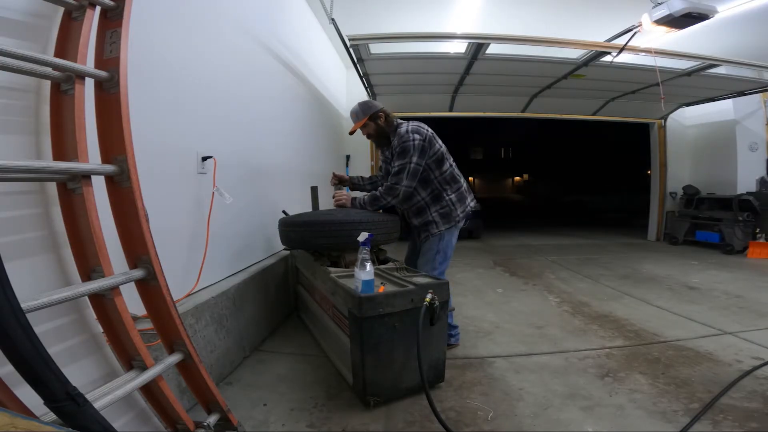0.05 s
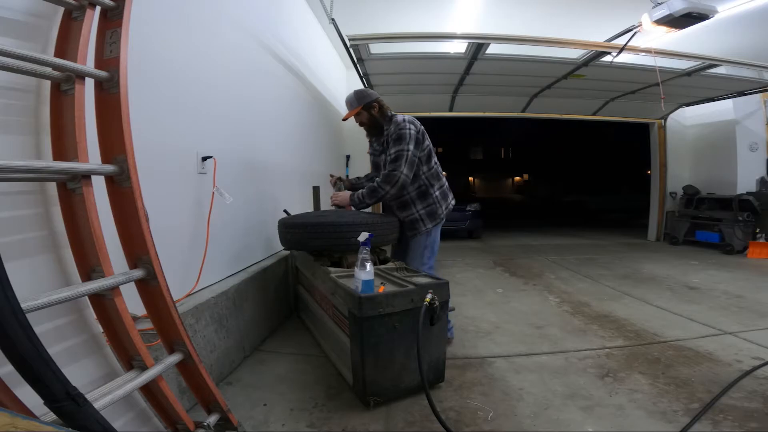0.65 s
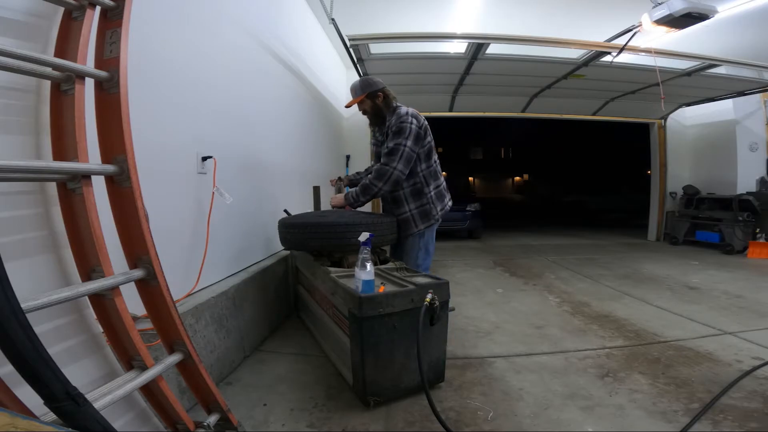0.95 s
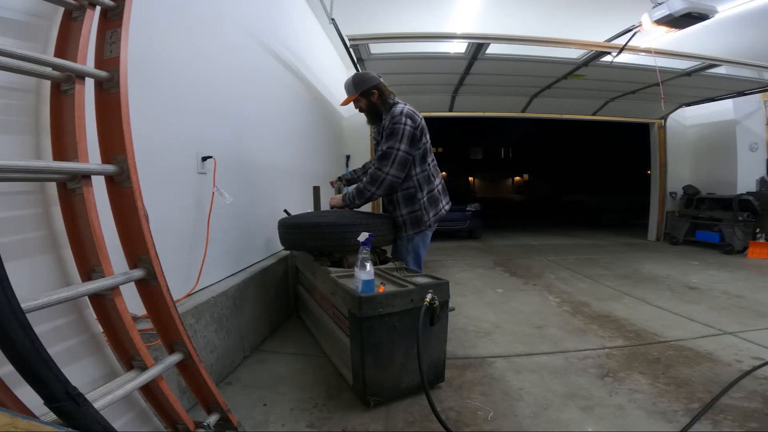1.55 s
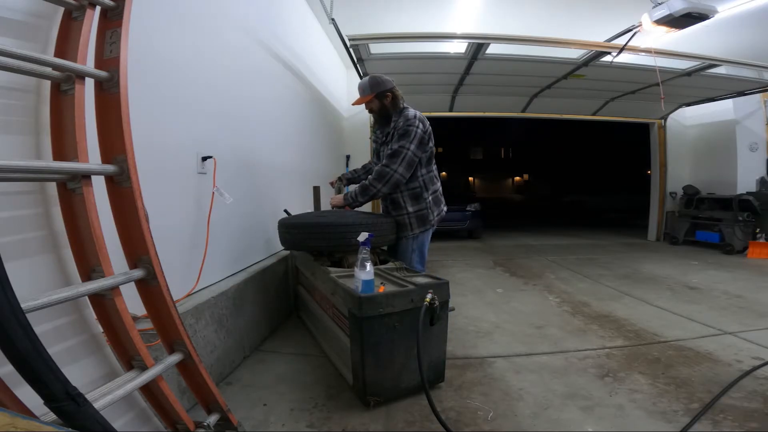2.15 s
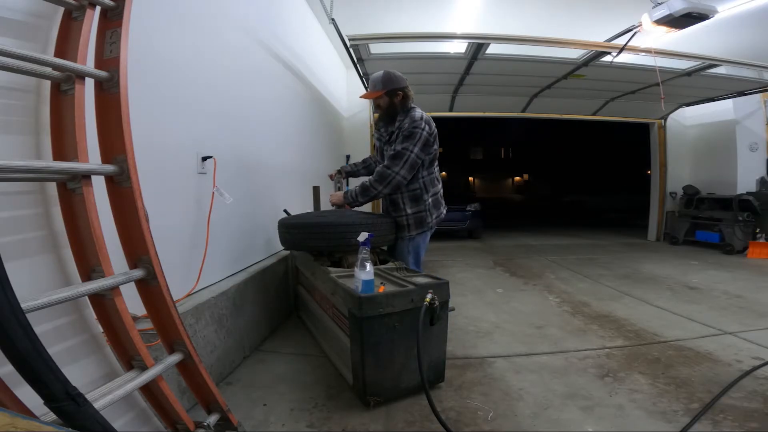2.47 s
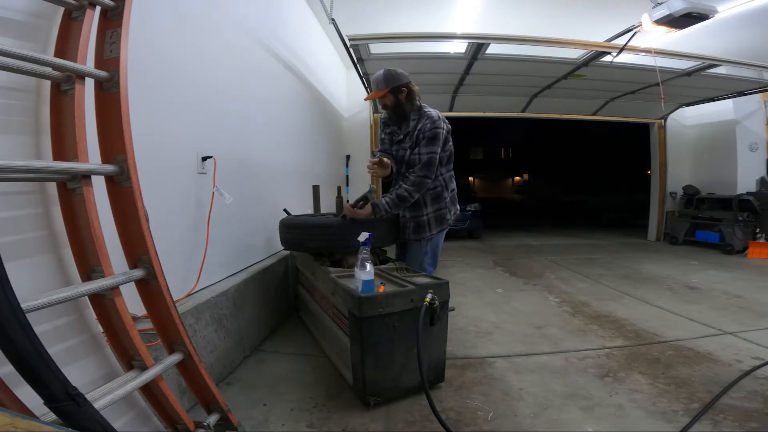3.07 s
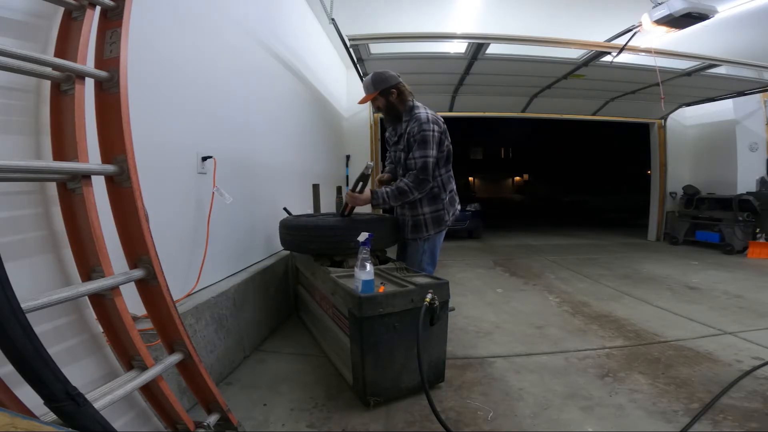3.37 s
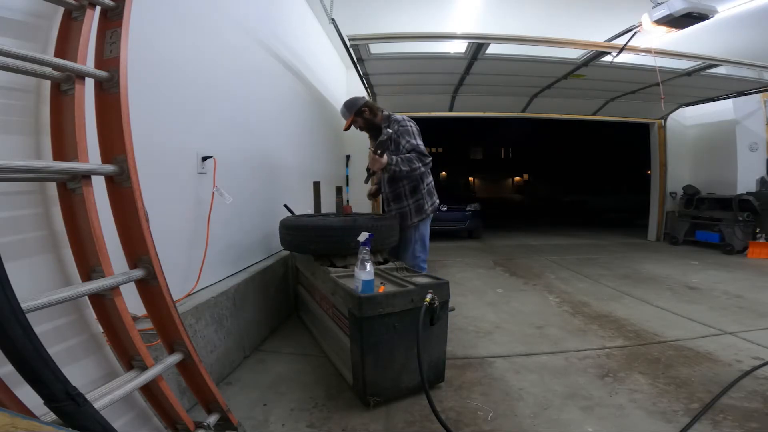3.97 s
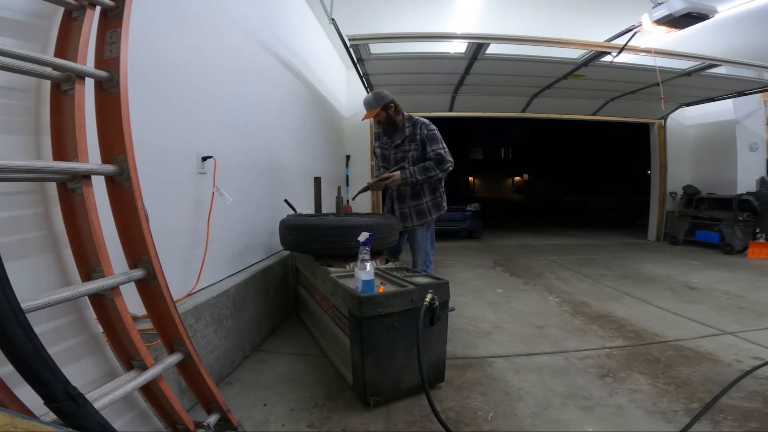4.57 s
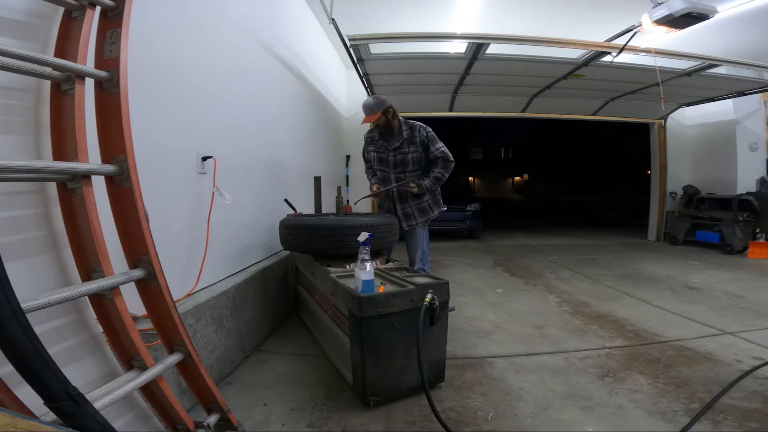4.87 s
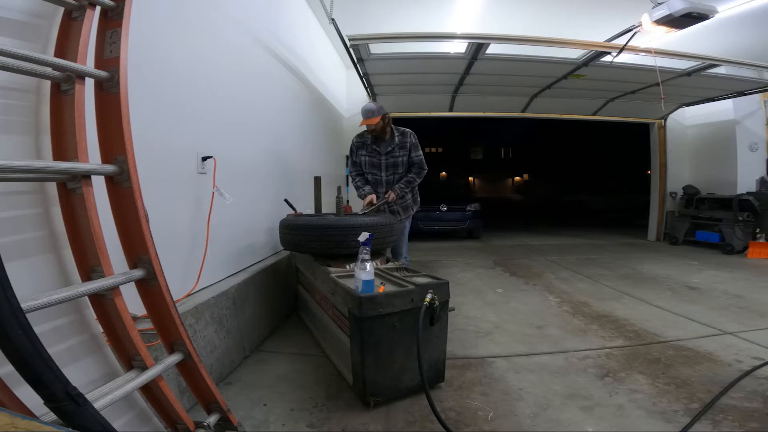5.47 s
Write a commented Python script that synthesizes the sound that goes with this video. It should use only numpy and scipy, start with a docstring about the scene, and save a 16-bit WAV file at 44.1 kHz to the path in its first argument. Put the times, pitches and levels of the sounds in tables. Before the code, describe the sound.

A piston air compressor runs loudly and evenly for the whole stretch, nearly six seconds: a low, fast-throbbing drone with rushing air and a fine valve rattle. Over it, someone works a steel bar around a tire. A dull, chattering clank comes at about 0.3 seconds, a light knock with two soft tire thuds around 1 second, and a small tap at 1.4. From 2 seconds the bar rasps along the rubber, strongest near 2.7, with a dull knock at 3. A short, rough squeak at 3.7 leads into the strongest clank at 3.85, bright and ringing on the wheel rim, with a thud beneath. Between 4.3 and 4.8 come faint hissing slides on wet rubber, a brief high squeak and light taps. Another clank lands at 5.4. Everything is heard through one microphone, with the short echo of a concrete garage.

```python
"""Tire change beside a compressor

One microphone in a concrete garage. A piston air compressor runs throughout, droning on the multiples
of its crank speed. In the same room someone works a steel bar around a tire on a manual changer:
the bar clanks on the rim, the tire thuds, and its rubber bead squeaks and scrapes along the steel."""
import sys
import numpy as np
from scipy import signal
from scipy.fft import rfft, irfft, next_fast_len
from scipy.io import wavfile
from scipy.ndimage import map_coordinates

SR = 44100
rng = np.random.default_rng(int(sys.argv[2]) if len(sys.argv) > 2 else 0)


def digitize_waveform(pressure):
    """Quantize a signal to 16-bit integers and store it at the path in sys.argv[1].

    Rows of a 2-D input are taken as channels; values are limited to [-1, 1].
    """
    field = np.atleast_2d(pressure).T
    bounded = np.clip(field, -1, 1)
    quanta = np.round(bounded * 32767).astype(np.int16)
    wavfile.write(sys.argv[1], SR, quanta)


N = 252693

# Levels in the tables are relative; spectra give the level per Hz.
# speed of the crank: time_s, turns_per_s
CRANK_SPEED = [(0, 24.803), (2, 24.815), (5.73, 24.832)]
# the pump's drone: crank_multiple, level_db
DRONE_LINES = [(1, -59), (2, -35), (3, -61), (4, -31.5), (5, -52), (6, -19.5), (7, -20), (8, -4.5),
               (9, -22.5), (10, -10), (11, -1.5), (12, -0.5), (13, -5.5), (14, 1.5), (15, -6.5), (16, -7),
               (17, -12), (18, -5), (19, -24.5), (20, -14), (21, -24), (22, -25.5), (23, -15.5), (24, -9),
               (25, -7.5), (26, -41), (27, -18.5), (28, -15), (29, -31), (30, -15), (31, -24.5), (32, -71),
               (33, -14), (34, -71), (35, -18.5), (36, -66), (37, -13.5), (38, -10), (39, -19), (40, -73),
               (41, -19), (42, -63), (43, -29), (44, -42), (45, -21.5), (46, -32.5), (47, -32), (48, -23),
               (49, -32), (50, -30), (51, -31), (52, -33), (53, -28), (54, -33), (55, -30.5), (56, -36)]
# when each range of the drone swells after the stroke, smeared by tank and walls: freq_hz, delay_turns
SWELL_DELAY = [(200, -.6), (270, -1), (350, -.53), (450, .56), (540, .8), (720, .8), (760, 1.17),
               (1050, 1.17), (1400, 2)]
# ringing of the pump's housing: pitch_hz, level_db
HOUSING_LINES = [(1491, -63), (1615, -54), (1685, -42.5), (1712, -44.5), (1787, -86), (1814, -52.5),
                 (1986, -73), (2719, -50), (2815, -54.5), (3165, -59), (3252, -71), (3898, -55.5),
                 (4194, -74)]
# rush of the valves and cooling fan: freq_hz, level_db
RUSH_SPECTRUM = [(200, -30), (520, 1), (750, 1), (950, 1), (1200, -2), (1450, -5), (2800, -5),
                 (3900, -10.5), (4800, -13.5), (6000, -19.5), (8500, -33), (11000, -35.5), (12200, -29),
                 (13500, -39)]
# rattle of the reed valves: freq_hz, level_db
RATTLE_SPECTRUM = [(1200, -49), (1420, 15), (2000, 7.5), (3300, 5), (4300, -3), (7000, -33.5), (9000, -53)]
# the motor's magnetic hum: pitch_hz, level_db
HUM_LINES = [(120, -45), (240, -31.5)]
# rumble of the tank: freq_hz, level_db
TANK_SPECTRUM = [(20, -44), (55, -42), (85, -26), (125, -10), (200, -7), (290, -8), (345, 0), (400, -5),
                 (470, -14), (900, -30), (2000, -60)]
# blows of steel on steel: start_s, level_db, brightness_db_per_octave, rim_share, contact_count
BLOWS = [(.198, -25.5, -12, 0, 1), (.265, -17.5, -8, 0.1, 3), (.926, -28, -8, .1, 2),
         (1.41, -28, -2, .2, 1), (3.035, -24, -11, 0.2, 2), (3.846, -14.5, 2.5, 0.86, 3),
         (4.674, -30, 3, 0.3, 1), (4.785, -29, -10, 0.1, 1), (5.437, -18.5, 0.5, 0.25, 2)]
# the wheel rim: pitch_hz, level_db, t60_s
RIM_MODES = [(1304, -5, 1), (1750, -4, 1), (2000, -14, 0.34), (2132, 4, 0.78), (2247, 6, 0.71),
             (2410, -1, 0.77), (2450, -3, 1), (2470, 2, 0.86), (2525, 1, 0.77), (2840, -19, .5),
             (2940, -0.5, 0.85), (3330, -8, 1), (3650, -6, 1), (3960, -8, 1), (3900, -8, 1),
             (4377, -2.5, 0.76), (4560, -11, 0.76), (4640, -21, .5), (5100, -13, 0.65), (5100, -19, 0.64),
             (5600, -24, 0.76), (6067, -16, 1), (6600, -18, 0.71), (6870, -15, 0.96), (7806, -20.5, 0.92),
             (8500, -27, 0.42), (9750, -29.5, 0.49), (11600, -32, 0.62), (12500, -38, 0.38)]
# the bar, damped by the hands: pitch_hz, level_db, t60_s
BAR_MODES = [(1660, -7, 0.15), (1943, 2, 0.078), (2670, -12, .12), (3070, -1.5, .12), (3320, -4, 0.1),
             (3870, -13, 0.064), (4240, -8.5, 0.19), (4990, -14, 0.68), (6350, -35, 0.14),
             (6970, -13, 0.16)]
# the dense short clatter of a contact: freq_hz, level_db
CLATTER_SPECTRUM = [(300, -19), (900, 0), (1400, -1), (1900, 1), (2600, 2.5), (3200, -0.5), (4400, -13),
                    (5500, -23), (8000, -33), (10000, -41), (12300, -35), (14000, -48)]
# knocks of the tire: start_s, level_db, pitch_hz
TIRE_THUDS = [(.21, -35, 103), (.28, -39, 80), (.35, -41, 90), (.955, -21, 128), (1.03, -22.5, 122),
              (1.4, -35, 125), (3.87, -21, 141), (3.9, -31.5, 85.6), (4.77, -37, 81.7)]
# stick-slip on rim and bead: start_s, rise_s, length_s, level_db, pitch_hz, octaves_per_s, roughness
BAR_SQUEAKS = [(.244, .008, 0.019, -34, 2530, 0.5, 0.57), (3.684, 0.003, .019, -25, 2800, 1, .75),
               (3.703, .004, 0.015, -28, 3070, 4, 1.16), (4.465, 0.035, 0.059, -24, 2770, -1.8, .08)]
# the bar dragged out from under the bead: start_s, rise_s, hold_s, fade_t60_s, level_db
BEAD_SCRAPES = [(2.05, 0.24, .36, .6, -37.5), (2.719, 0.02, .11, 1.4, -29), (3.5, 0.27, .02, 2, -40)]
# rasp of the bar on the bead: freq_hz, level_db
SCRAPE_SPECTRUM = [(400, -10), (1400, 6.5), (3000, 4), (4500, 2.5), (7000, -5), (8500, -18), (10500, -18.5),
                   (12200, -12.5), (14000, -42)]
# steel sliding on wet rubber: start_s, length_s, level_db, centre_hz, octaves_per_s
WET_SLIDES = [(3.248, 1, -49.5, 6130, 0.091), (4.304, .17, -42, 6100, -0.075),
              (4.47, 0.072, -37, 5440, 0.056), (4.52, .15, -37.5, 5950, -.4),
              (4.716, 0.09, -36.5, 5550, -0.37)]
# reverberation of the garage: freq_hz, t60_s
GARAGE_DECAY = [(100, 0.59), (500, 0.65), (2500, 0.43), (6000, 0.99), (13000, 1)]


def amp(db):
    """Decibels to gain."""
    return 10 ** (np.asarray(db) / 20)


def unit(x):
    """Scale to rms 1."""
    return x / np.sqrt(np.mean(x ** 2) + 1e-20)


def decay(t, t60):
    """Gain that falls 60 dB in t60 seconds."""
    return np.exp(-np.log(1000) * t / t60)


def along(points, hz):
    """Read (freq_hz, value) points on a log frequency axis."""
    freqs, values = np.transpose(points)
    return np.interp(np.log(hz + 1), np.log(freqs + 1), values)


def wobble(rate):
    """A smooth random curve, rate knots a second."""
    steps = np.arange(0, N * rate / SR + 1, 1 / 8)
    knots = rng.standard_normal(int(steps[-1]) + 2)
    smooth = map_coordinates(knots, [steps], mode="nearest")
    return np.interp(np.arange(N) * rate / SR, steps, smooth)


def filtered(x, response):
    """Shape x by a gain that depends on frequency."""
    size = next_fast_len(len(x) + SR // 4)
    return irfft(rfft(x, size) * response(np.fft.rfftfreq(size, 1 / SR)), size)[:len(x)]


def noise(spectrum, size=N):
    """Coloured noise of rms 1."""
    return unit(filtered(rng.standard_normal(size), lambda hz: amp(along(spectrum, hz))))


def add(track, start_s, sound):
    """Mix a sound in at start_s."""
    part = track[round(start_s * SR):][:len(sound)]
    part += sound[:len(part)]


def garage(x, wet_db):
    """Direct sound plus the bare walls' answer, at about the same power; wetter sounds farther off."""
    hz, t, bands = signal.stft(rng.standard_normal(SR), SR, nperseg=256)
    bands = bands * decay(t, along(GARAGE_DECAY, hz)[:, None])
    tail = signal.istft(bands, SR, nperseg=256)[1]
    echo = signal.fftconvolve(x, tail / np.linalg.norm(tail))[:len(x)]
    return (x + amp(wet_db) * echo) / np.hypot(1, amp(wet_db))


def drone(crank, level_db=-15):
    """Every piston stroke repeats the same throb; low, middle and high ranges swell in turn."""
    multiples, levels_db = np.transpose(DRONE_LINES)
    multiples = np.round(multiples)
    delay_turns = along(SWELL_DELAY, multiples * CRANK_SPEED[0][1])
    lags = 2 * np.pi * np.cumsum(delay_turns) + .12 * rng.standard_normal(len(multiples))
    out = np.zeros(N)
    for multiple, db, lag in zip(multiples, levels_db, lags):
        drift = 1 + .07 * wobble(2)
        out += amp(db) * drift * np.cos(multiple * crank - lag)
    return amp(level_db) * unit(out)


def housing(crank, gain_db=2, drift_db=2, swell_turn=.42):
    """The housing rings at the crank multiples nearest its pitches, which beat once a turn."""
    out = np.zeros(N)
    for hz, db in HOUSING_LINES:
        multiple = round(hz / CRANK_SPEED[1][1])
        gain = amp(db + drift_db * wobble(1.98))
        phase = multiple * (crank - 2 * np.pi * swell_turn) + .5 * rng.standard_normal()
        out += gain * np.cos(phase)
    return amp(gain_db) * np.sqrt(2) * out


def valves(crank, rush_db=-29.5, rattle_db=-39, pulsing=.03, waver_db=.73):
    """Air rushes in step with the piston; the reed valves rattle alike on every turn."""
    air = noise(RUSH_SPECTRUM) * (1 + pulsing * np.cos(crank)) * amp(waver_db * wobble(11))
    one_turn = noise(RATTLE_SPECTRUM, size=round(SR / CRANK_SPEED[1][1]))
    position = crank / (2 * np.pi) % 1 * len(one_turn)
    rattle = map_coordinates(one_turn, [position], mode="grid-wrap")
    return amp(rush_db) * air + amp(rattle_db) * rattle


def compressor(tank_db=-27.6, tank_waver_db=1):
    """The steady bed: one crank drives pump, housing and valves; the motor hums and the tank rumbles."""
    t = np.arange(N) / SR
    turns_per_s = np.interp(t, *np.transpose(CRANK_SPEED))
    crank = 2 * np.pi * np.cumsum(turns_per_s) / SR
    hum = sum(amp(db) * np.sqrt(2) * np.sin(2 * np.pi * hz * t) for hz, db in HUM_LINES)
    tank = amp(tank_db + tank_waver_db * wobble(8)) * noise(TANK_SPECTRUM)
    return drone(crank) + housing(crank) + valves(crank) + hum + tank


def contacts(first_gap_s=.0105, gap_growth=1.75, loss_db=3):
    """Some blows strike once; others chatter, with weaker contacts at widening gaps."""
    for start_s, level_db, brightness, rim_share, count in BLOWS:
        for k in range(round(count)):
            yield start_s, level_db - loss_db * k, brightness, rim_share
            start_s += first_gap_s * gap_growth ** k


def ringing(modes, tilt, vary_db, blur_rad):
    """One second of struck modes; the steel shifts as it rings, which blurs its partials."""
    t = np.arange(SR) / SR
    out = np.zeros(SR)
    for hz, db, t60 in modes:
        phase = 2 * np.pi * (hz * t + rng.random())
        wander = blur_rad * np.cumsum(rng.standard_normal(SR)) / np.sqrt(SR)
        gain = amp(db + tilt(hz) + vary_db * rng.standard_normal())
        out += gain * decay(t, t60) * np.sin(phase + wander)
    return out


def clanks(rim_db=-9, bar_db=-10, clatter_db=1, wash_db=-7, pivot_hz=2500, contact_s=.0003):
    """Each contact clatters and rings the bar; a free blow also rings the rim."""
    out, t = np.zeros(N), np.arange(SR) / SR
    onset = 1 - np.exp(-(t / contact_s) ** 2)
    for start_s, level_db, brightness, rim_share in contacts():
        tilt = lambda hz: brightness * np.log2(np.maximum(hz, pivot_hz / 2) / pivot_hz)
        rim = rim_share * amp(rim_db) * ringing(RIM_MODES, tilt, vary_db=0, blur_rad=8)
        bar = amp(bar_db) * ringing(BAR_MODES, tilt, vary_db=3, blur_rad=5.7)
        wash = rim_share * amp(wash_db) * decay(t, t60=.58)  # the rim's dense weak modes
        burst = noise([(hz, db + tilt(hz)) for hz, db in CLATTER_SPECTRUM], size=SR)
        clatter = amp(clatter_db) * garage(burst * (decay(t, t60=.088) + wash), wet_db=-4)
        add(out, start_s, amp(level_db) * onset * (rim + bar + clatter))
    return out


def thuds(t60=.19, rise_s=.014, gain_db=4):
    """The tire and its stand give a soft low knock when the bar shifts, nearly dry at the microphone."""
    out, t = np.zeros(N), np.arange(SR // 2) / SR
    onset = 1 - np.exp(-(t / rise_s) ** 2)
    for start_s, db, hz in TIRE_THUDS:
        knock = onset * decay(t, t60) * np.sin(2 * np.pi * hz * t)
        add(out, start_s, amp(db + gain_db) * garage(knock, wet_db=-17))
    return out


def stroke(start_s, rise_s, length_s, t60):
    """Gain of one push of the bar: it swells, holds to the end of its length, then dies away."""
    t = np.arange(N) / SR - start_s
    return np.clip(t / rise_s, 0, 1) * decay(np.maximum(t - length_s, 0), t60)


def glide(start_s, length_s, hz, octaves_per_s):
    """Pitch of one push: it drifts evenly while the pressure changes."""
    return hz * 2 ** (octaves_per_s * np.clip(np.arange(N) / SR - start_s, 0, length_s))


def squeaks(jitter=.00585, octave_db=-15, halfway_db=-6):
    """Slips lock briefly into a tone; when rough, they scatter and alternate, adding lines halfway."""
    out = np.zeros(N)
    for start_s, rise_s, length_s, db, hz, drift, roughness in BAR_SQUEAKS:
        scatter = .11 * roughness * wobble(2500)
        pitch_hz = glide(start_s, length_s, hz, drift) * (1 + jitter * wobble(300) + scatter)
        phase = 2 * np.pi * np.cumsum(pitch_hz) / SR
        halfway = amp(halfway_db) * roughness * (np.sin(phase / 2) + np.sin(3 * phase / 2))
        tone = np.sin(phase) + amp(octave_db) * np.sin(2 * phase) + halfway
        out += amp(db) * np.sqrt(2) * stroke(start_s, rise_s, length_s, t60=.048) * tone
    return garage(out, wet_db=-11)


def scrapes():
    """The bar rasps along the bead, heard about equally direct and off the walls."""
    force = sum(amp(db) * stroke(start_s, rise_s, rise_s + hold_s, t60)
                for start_s, rise_s, hold_s, t60, db in BEAD_SCRAPES)
    return garage(force * noise(SCRAPE_SPECTRUM), wet_db=-.5)


def slides(width_hz=560, grain_db=2, rise_s=.022):
    """Fast tiny slips make a narrow hiss whose centre follows the pressure; more room than direct."""
    out = np.zeros(N)
    for start_s, length_s, db, hz, drift in WET_SLIDES:
        slips = filtered(rng.standard_normal(N), lambda f: 1 / (1 + (f / (2 * width_hz)) ** 2) ** 2)
        carrier = np.cos(2 * np.pi * np.cumsum(glide(start_s, length_s, hz, drift)) / SR)
        hiss = unit(slips * carrier * amp(grain_db * wobble(60)))
        out += amp(db) * stroke(start_s, rise_s, length_s, t60=.25) * hiss
    return garage(out, wet_db=5)


def scene():
    """At the microphone, in mono: the tire work over the running compressor."""
    return (compressor() + clanks() + thuds() + squeaks() + scrapes() + slides())[None]


def record(dry):
    """The microphone chain rounds off the highest peaks, notches the treble and cuts the top steeply."""
    ceiling, notch_hz, top_hz = .85, 9030, 13400
    rounded = dry[0] / (1 + np.abs(dry[0] / ceiling) ** 10) ** (1 / 10)
    notch = lambda hz: np.abs(hz - notch_hz) / np.hypot(hz - notch_hz, 170)
    band_limit = lambda hz: 1 / np.sqrt(1 + (hz / top_hz) ** 160)
    return filtered(rounded, lambda hz: notch(hz) * band_limit(hz))[None]


dry = scene()
out = record(dry)
digitize_waveform(out)
```